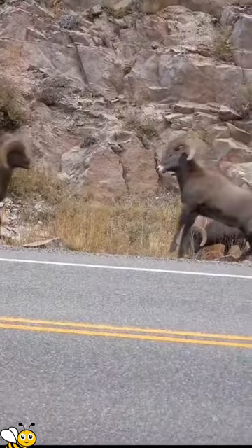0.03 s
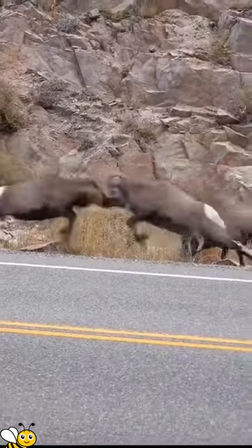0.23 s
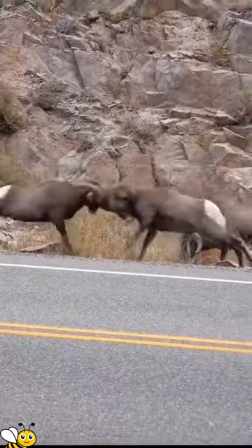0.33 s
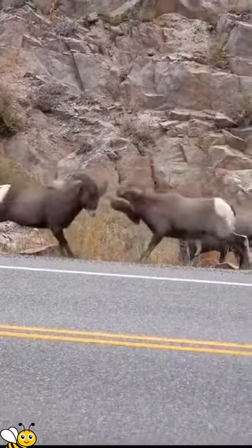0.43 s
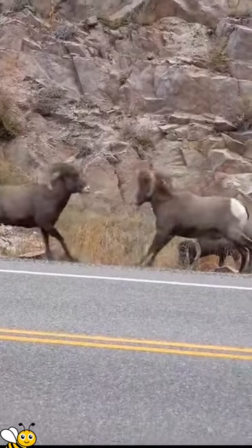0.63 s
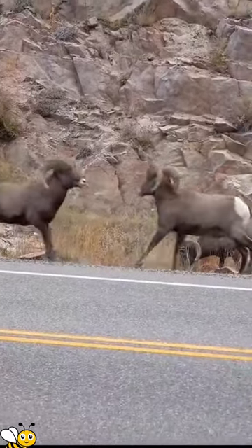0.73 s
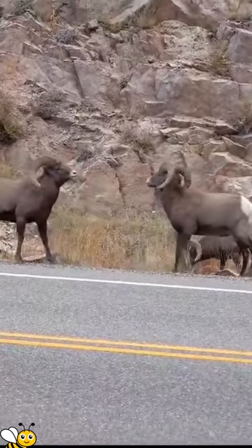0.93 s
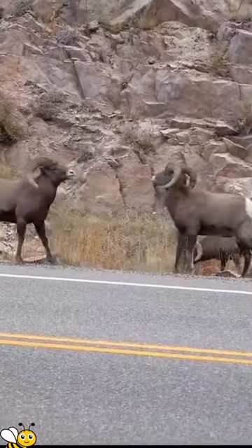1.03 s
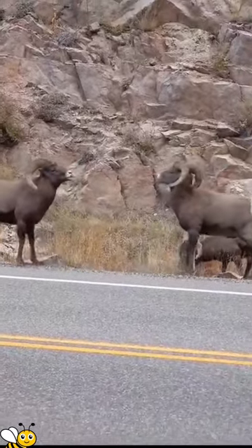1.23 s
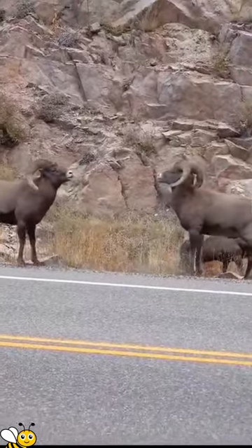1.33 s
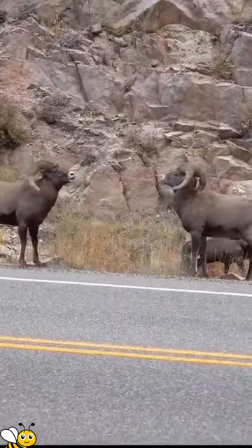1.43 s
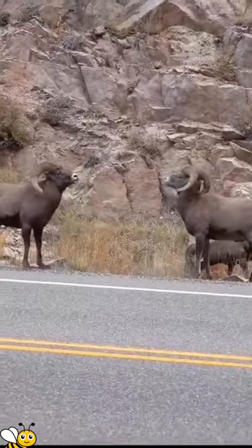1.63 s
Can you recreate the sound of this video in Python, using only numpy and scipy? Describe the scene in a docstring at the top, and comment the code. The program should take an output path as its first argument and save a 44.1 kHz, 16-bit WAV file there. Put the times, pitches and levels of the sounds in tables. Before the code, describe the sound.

Two rams clash horns outdoors over a low rumble. Hooves knock and scuffle on gravel from about 0.2 seconds. At 0.3 seconds the horns collide with a loud crack and a body thump, briefly overloading the microphone and leaving a faint, dull echo. Hoof knocks, hissing grit and a few stone clinks follow until 0.8 seconds. Then soft footfalls crunch in dry grass, fading by about 1.7 seconds.

```python
"""Two rams fight on a gravel verge below a cliff, over a low outdoor rumble and drone.
First their hooves knock and scuffle as they charge, spraying grit. At about 0.3 s the horns crash
together: they crack and ring, the bodies thump, and the bang overloads the microphone. The cliff
sends back a faint, dull echo. More hoof knocks follow, and a few stones clink. From about 0.9 s
the animals settle, with soft footfalls and small crunching steps in dry grass."""
import sys
import numpy as np
from scipy import signal
from scipy.fft import rfft, irfft
from scipy.io import wavfile

SR = 44100
rng = np.random.default_rng(int(sys.argv[2]) if len(sys.argv) > 2 else 0)


def materialize(psi):
    """Save the field psi as 16-bit PCM at rate SR to the path in sys.argv[1].

    A 1-D psi becomes a single channel; in a 2-D psi each row is a channel.
    """
    bounded = np.clip(np.atleast_2d(psi).T, -1, 1)
    quanta = np.round(bounded * 32767).astype(np.int16)
    wavfile.write(sys.argv[1], SR, quanta)


N = 74970
T = np.arange(N) / SR

# tone of the outdoor rumble: pitch_hz, level_db
AIR_TONE = [(20, -1.5), (38, -3.5), (58, 6), (85, -0.5), (140, -6.5), (230, -12.5), (350, -21),
            (900, -33.5), (2500, -42), (4000, -56.5), (8000, -75), (15000, -79)]
# how loudly the grass crackles: time_s, level_db
GRASS_LOUDNESS = [(0, -61), (0.1, -50), (0.85, -49.5), (1.03, -49.5), (1.09, -47), (1.14, -53),
                  (1.37, -47.5), (1.43, -55), (1.5, -46), (1.54, -60.5), (1.7, -78.5)]
# tone of the grass: pitch_hz, level_db
GRASS_TONE = [(300, 10.5), (1000, 3), (2500, -9), (4200, -21.5), (5500, -27), (8000, -34), (15000, -48.5)]
# small steps in the grass: start_s, level_db, pitch_hz, fade_s (the time to fall by 60 dB)
GRASS_STEPS = [(0.192, -30.5, 1220, 0.026), (0.884, -35, 1300, .02), (0.92, -42, 1094, 0.048),
               (0.9433, -27.5, 1610, 0.044), (1.004, -34.5, 1570, 0.043), (1.062, -46, 686, 0.025),
               (1.145, -37, 695, 0.023), (1.169, -40.5, 1000, 0.049), (1.216, -40, 780, .04),
               (1.264, -36.5, 745, 0.024), (1.293, -37.5, 990, 0.027), (1.313, -37, 890, .05),
               (1.365, -38, 1080, 0.042), (1.466, -38.5, 1040, 0.024), (1.486, -47.5, 1150, 0.027)]
# how loudly the grit sprays: time_s, level_db
GRIT_LOUDNESS = [(0, -79), (0.16, -63), (0.21, -46), (0.25, -33), (0.285, -36.5), (0.33, -27), (0.38, -30),
                 (0.415, -32), (0.49, -31.5), (0.545, -37.5), (0.575, -42), (0.605, -40), (0.645, -38),
                 (0.70, -58), (0.73, -52), (0.80, -49), (0.87, -62), (0.95, -62), (1.05, -103),
                 (1.7, -76.5)]
# tone of the grit: pitch_hz, level_db
GRIT_TONE = [(900, -8), (1800, 4), (2800, 4), (4000, 5.5), (6000, 2), (10000, -1.5), (14500, -4),
             (16000, -14)]
# how hard the hooves scuffle: time_s, level_db
SCUFF_LOUDNESS = [(0.17, -65), (0.222, -32), (0.25, -11), (0.28, -20.5), (0.315, -23.5), (0.37, -27),
                  (0.412, -40), (0.432, -9.5), (0.455, -33), (0.485, -19), (0.525, -26.5), (0.55, -23),
                  (0.575, -40.5), (0.6, -25.5), (0.645, -32), (0.70, -79), (0.755, -63), (0.79, -24.5),
                  (0.86, -127), (0.95, -68)]
# tone of the scuffling: pitch_hz, level_db
SCUFF_TONE = [(40, -22.5), (90, -15.5), (150, 9.5), (300, 5.5), (580, 3.5), (780, -2.5), (1000, 4),
              (1350, -3), (1900, -17), (3500, -38.5)]
# grit snapping under a hoof: start_s, level_db, pitch_hz, fade_s
GRIT_SNAPS = [(0.243, -27.5, 7000, 0.15), (0.3047, -27, 6000, 0.009), (0.31, -18, 6500, .01),
              (0.4248, -21.5, 4030, 0.011), (0.453, -18, 8000, 0.0099), (0.790, -40, 7000, 0.021),
              (0.829, -48, 7000, 0.053)]
# stones clinking: start_s, level_db, pitch_hz, fade_s
STONE_CLINKS = [(0.466, -23, 3930, .012), (0.502, -30, 2753, 0.14), (0.585, -21.5, 2705, .04)]
# small pebbles chinking: start_s, level_db, pitch_hz, fade_s
PEBBLE_CHINKS = [(0.829, -42, 3940, 0.056), (0.984, -42.5, 4080, 0.032)]
# hooves set down softly: start_s, level_db, pitch_hz, fade_s
SOFT_FOOTFALLS = [(1.053, -22, 295, 0.025), (1.114, -30, 215, 0.058), (1.398, -23.5, 245, .08),
                  (1.526, -33, 154.5, 0.22), (1.664, -25, 251, 0.032)]
# hooves striking hard: start_s, level_db, pitch_hz, fade_s
HOOF_KNOCKS = [(0.046, -28, 557, 0.012), (0.1362, -31, 1000, 0.013), (0.1935, -24, 410, 0.042),
               (0.2435, -8, 803, 0.029), (0.2474, 0, 1170, 0.0066), (0.2575, -3, 540, 0.006),
               (0.264, -7.5, 293, 0.023), (0.311, -4.5, 790, 0.0066), (0.4240, 11.5, 1000, 0.0052),
               (0.4350, 3.5, 547, 0.018), (0.4793, -12, 390, .011), (0.4863, -10, 684, 0.016),
               (0.5025, -1, 697, 0.011), (0.5370, -3.5, 597, 0.021), (0.585, -8.5, 532, 0.015),
               (0.6005, -13, 900, 0.0045), (0.627, 5.5, 574, 0.0051), (0.7755, 1.5, 1005, 0.0036),
               (0.7893, -1, 695, 0.0094), (0.823, -7.5, 800, 0.0041)]
# the weight of the bodies following through: start_s, level_db, pitch_hz, fade_s
BODY_THUMPS = [(0.3287, 3, 234.6, .05), (0.3389, 2, 157, 0.055)]
# the notes a struck horn rings with: pitch_hz, level_db (added to the level of the hit)
HORN_NOTES = [(508, -6), (750, -17.5), (955, -13.5), (1200, -8), (1560, -7), (1738, -7.5), (2175, -14.5),
              (2506, -14.5)]
# the crack of horn on horn: start_s, level_db, pitch_hz, fade_s
HORN_HITS = [(0.3201, 11.5, 921, .02), (0.3346, 5.5, 1677, 0.011)]


def from_db(db):
    """Turn decibels into a number to multiply by."""
    return 10 ** (np.asarray(db) / 20)


def unit_power(x):
    """Scale a sound to an average power of one."""
    return x / np.sqrt(np.mean(x ** 2) + 1e-20)


def loudness(points):
    """Join (time_s, level_db) points into a volume curve."""
    return from_db(np.interp(T, *np.transpose(points)))


def shape_tone(x, points):
    """Shape lows and highs by (pitch_hz, level_db) points; the result has a power of one."""
    hz, db = np.transpose(points)
    pitches = np.maximum(np.fft.rfftfreq(N, 1 / SR), 1)
    gains = from_db(np.interp(np.log(pitches), np.log(hz), db))
    return unit_power(irfft(rfft(x) * gains, N))


def lowpass(x, hz, order=2):
    """Soften everything above hz."""
    return signal.sosfilt(signal.butter(order, hz, fs=SR, output="sos"), x + 1e-18)


def highpass(x, hz):
    """Soften everything below hz."""
    return signal.sosfilt(signal.butter(2, hz, "high", fs=SR, output="sos"), x + 1e-18)


def rise(start, rise_s):
    """The force of a hit takes a moment to build up."""
    return 1 - np.exp(-np.maximum(T - start, 0) / rise_s)


def decay(start, fade):
    """A volume curve that jumps up at start, then falls 60 dB in fade seconds."""
    return (T >= start) * np.exp(-np.log(1000) * np.clip((T - start) / fade, 0, 10))


def ring(start, db, hz, fade):
    """One dying note of something struck."""
    return from_db(db) * decay(start, fade) * np.sin(2 * np.pi * hz * (T - start))


def burst(start, db, hz, fade, q=1):
    """A dying shower of tiny cracks, made of noise; a higher q gives a clearer pitch."""
    noise = signal.lfilter(*signal.iirpeak(hz, q, fs=SR), rng.standard_normal(N))
    return from_db(db) * decay(start, fade) * unit_power(noise)


def grains(per_s, spread_db):
    """Random clicks, most small and a few large."""
    sizes = from_db(spread_db * np.minimum(rng.exponential(1, N), 5))
    return (rng.random(N) < per_s / SR) * sizes * rng.choice([-1, 1], N)


def ticks(per_s, spread_db, q, clump_db, clump_hz):
    """Grains come in clumps; each of 20 sizes ticks at its own pitch, about per_s times a second."""
    clumps = from_db(clump_db * unit_power(lowpass(rng.standard_normal(N), clump_hz)))
    out = np.zeros(N)
    for hz in np.geomspace(500, 15000, 20):
        clicks = grains(per_s, spread_db) * clumps
        out += signal.lfilter(*signal.iirpeak(hz, q, fs=SR), clicks + 1e-18)
    return out


def open_air(rumble_db=-35, drone_db=-41.5, drone_hz=58.2, waver_hz=5.5):
    """A soft outdoor rumble and a wavering low drone, like a distant engine."""
    pitch = drone_hz + waver_hz * unit_power(lowpass(rng.standard_normal(N), hz=11))
    drone = unit_power(np.sin(2 * np.pi * np.cumsum(pitch) / SR))
    rumble = shape_tone(rng.standard_normal(N), AIR_TONE)
    return from_db(rumble_db) * rumble + from_db(drone_db) * drone


def cliff_echo(x, echo_db=-32, delay_s=0.012, fade_s=0.51):
    """The broken rock face scatters sound back as a short, dull tail."""
    tail = lowpass(rng.standard_normal(N), hz=2430) * decay(delay_s, fade_s)
    return from_db(echo_db) * signal.fftconvolve(x, tail / np.linalg.norm(tail))[:N]


def grass(tap_hz=586):
    """Dry stalks crackle; each small step is a crunch with a dull tap of the hoof under it."""
    stalks = ticks(per_s=160, spread_db=3, q=1.6, clump_db=7, clump_hz=170)
    steps = np.zeros(N)
    for start, db, hz, fade in GRASS_STEPS:
        crunch = burst(start, db, hz, fade, q=4.4)
        tap = burst(start, db - 0.5, tap_hz, fade, q=4.4)
        steps += rise(start, rise_s=0.0012) * (crunch + tap)
    return loudness(GRASS_LOUDNESS) * shape_tone(stalks, GRASS_TONE) + lowpass(steps, hz=2870)


def grit():
    """Kicked-up grit rains back onto the ground with a hiss."""
    spray = ticks(per_s=950, spread_db=3, q=10.2, clump_db=2.5, clump_hz=71)
    return loudness(GRIT_LOUDNESS) * shape_tone(spray, GRIT_TONE)


def gravel():
    """Hooves churn the ground: dull scuffs, sharp snaps, and stones and pebbles knocking together."""
    scuffs = loudness(SCUFF_LOUDNESS) * shape_tone(grains(per_s=2200, spread_db=0.5), SCUFF_TONE)
    scuffs = highpass(highpass(scuffs, hz=125), hz=125)
    snaps = sum(burst(*row) for row in GRIT_SNAPS)
    stones = sum(ring(*row) for row in STONE_CLINKS)
    pebbles = sum(burst(*row, q=42) for row in PEBBLE_CHINKS)
    return scuffs + snaps + stones + pebbles


def hooves(overtone_ratio=1.72, overtone_db=-7.5):
    """A hard step knocks with two dull notes that die fast; a soft step is one low thud."""
    knocks = np.zeros(N)
    for start, db, hz, fade in HOOF_KNOCKS:
        note = ring(start, db, hz, fade)
        overtone = ring(start, db + overtone_db, hz * overtone_ratio, fade)
        knocks += rise(start, rise_s=0.00042) * (note - overtone)
    knocks = highpass(lowpass(knocks, hz=1590, order=4), hz=238)
    thuds = sum(ring(*row) for row in SOFT_FOOTFALLS)
    return knocks + lowpass(thuds, hz=406)


def horns(ring_s=0.035):
    """Each hit makes a crack and sets the horns ringing; the bodies thump just after."""
    crash = sum(ring(*row) for row in BODY_THUMPS)
    for start, db, hz, fade in HORN_HITS:
        crunch = lowpass(burst(start, db - 1.5, hz, fade, q=1.3), hz=4170)
        crack = ring(start, db, hz, fade) + crunch
        ringing = sum(ring(start, db + note_db, note_hz, ring_s) for note_hz, note_db in HORN_NOTES)
        crash += rise(start, rise_s=0.0023) * (crack + ringing)
    return highpass(crash, hz=97)


def scene():
    """Mix everything into one channel; only the horns and hooves echo."""
    blows = horns() + hooves()
    return (blows + cliff_echo(blows) + gravel() + grit() + grass() + open_air())[None]


def record(dry, ceiling=0.68, hardness=4, top_hz=15650):
    """The overloaded microphone flattens the loudest peaks; then the highest treble is cut."""
    flattened = dry / (1 + np.abs(dry / ceiling) ** hardness) ** (1 / hardness)
    return signal.sosfilt(signal.ellip(10, .1, 80, top_hz, fs=SR, output="sos"), flattened)


dry = scene()
out = record(dry)
materialize(out)
```